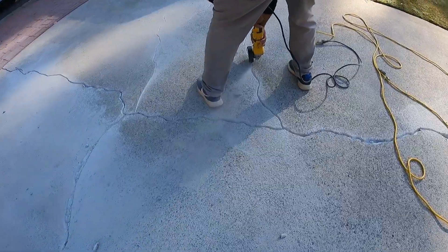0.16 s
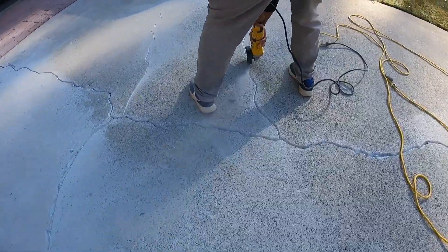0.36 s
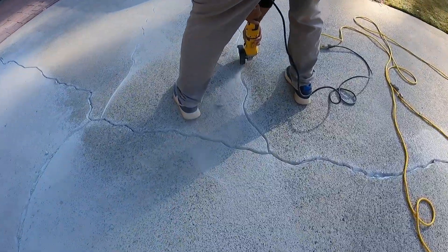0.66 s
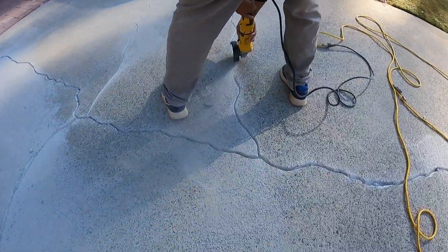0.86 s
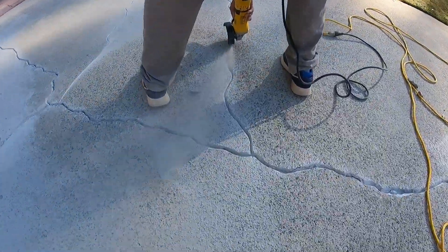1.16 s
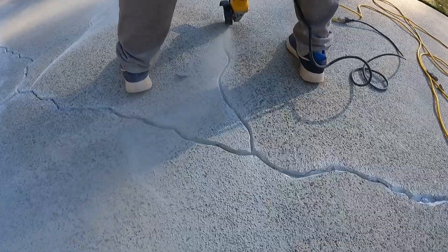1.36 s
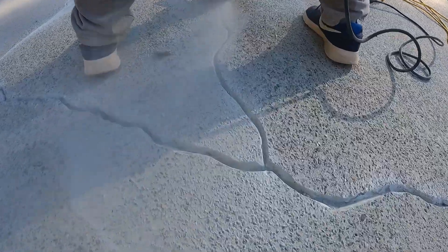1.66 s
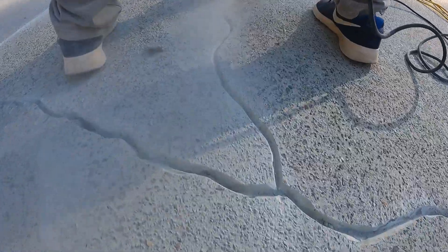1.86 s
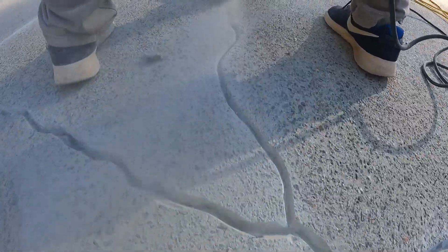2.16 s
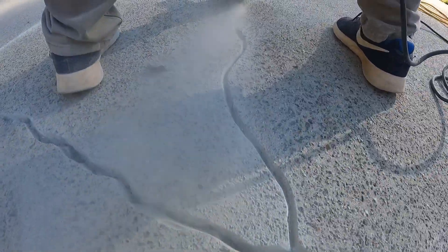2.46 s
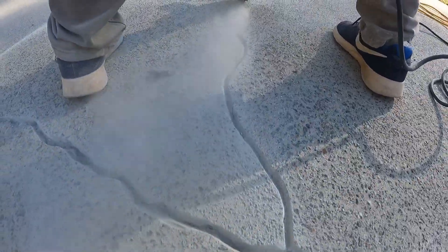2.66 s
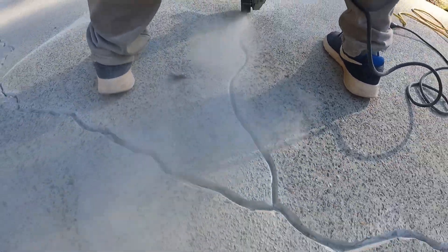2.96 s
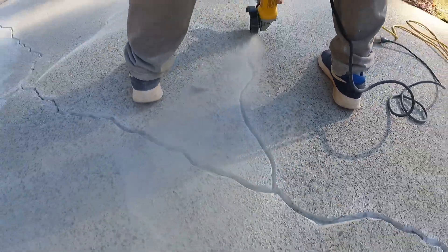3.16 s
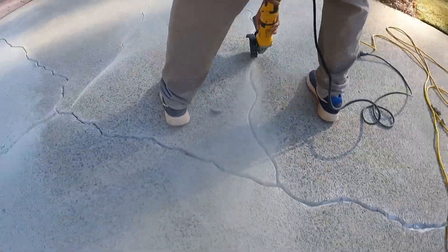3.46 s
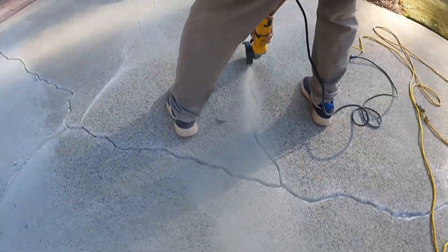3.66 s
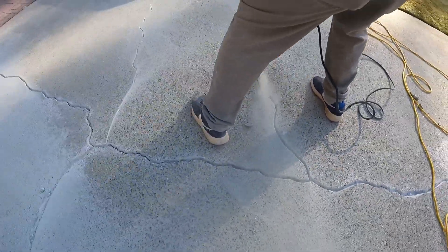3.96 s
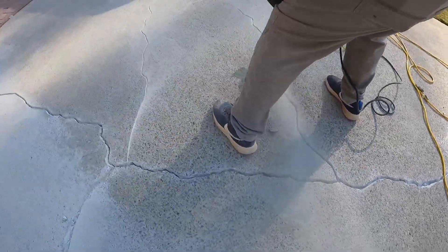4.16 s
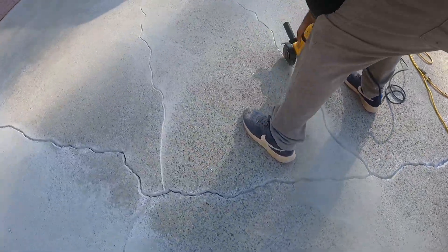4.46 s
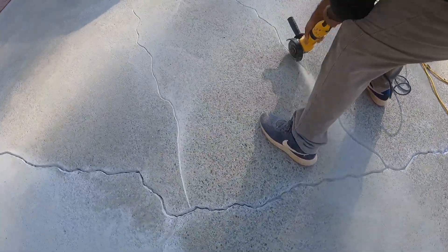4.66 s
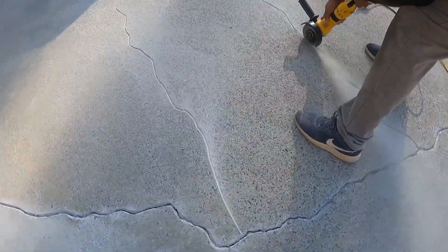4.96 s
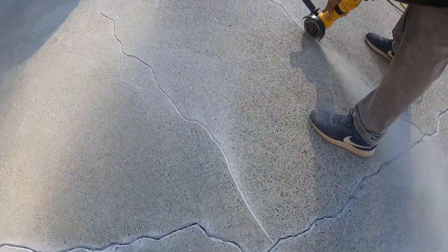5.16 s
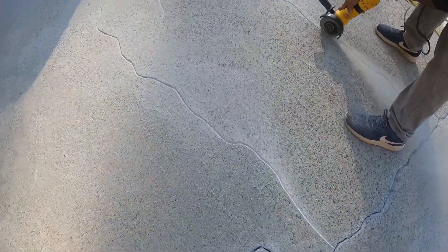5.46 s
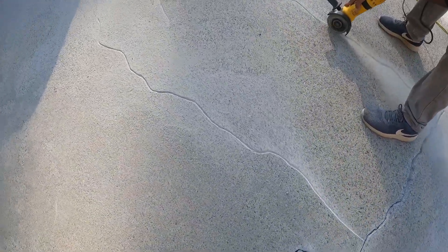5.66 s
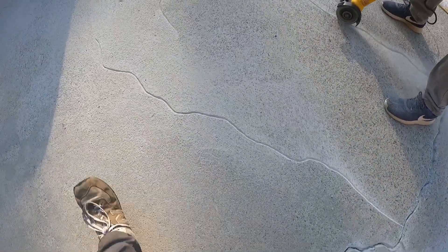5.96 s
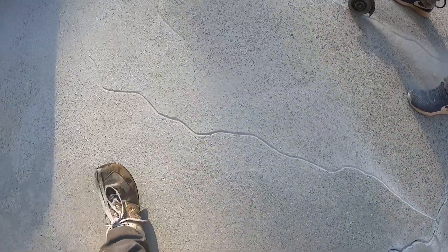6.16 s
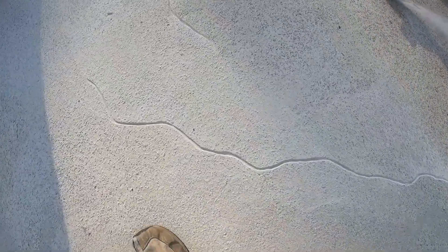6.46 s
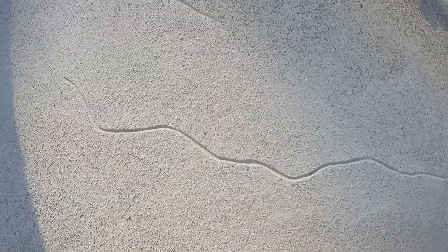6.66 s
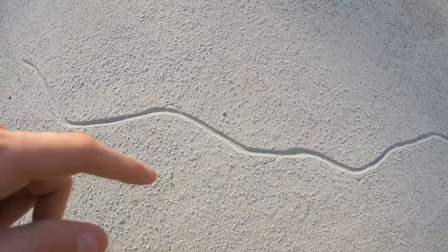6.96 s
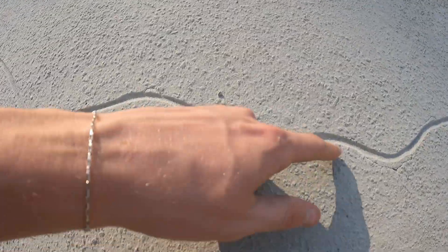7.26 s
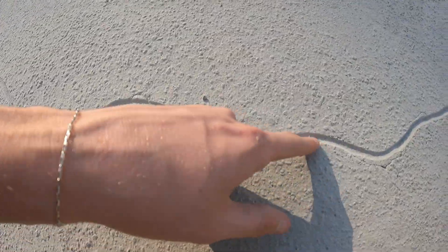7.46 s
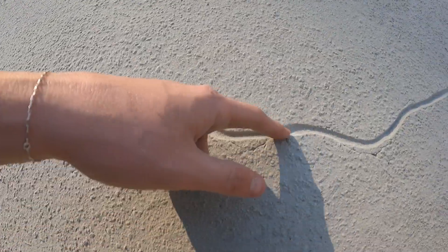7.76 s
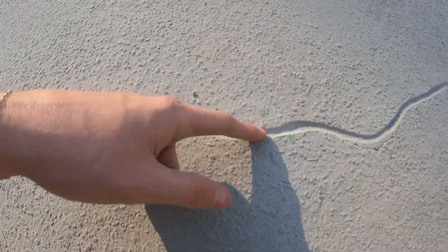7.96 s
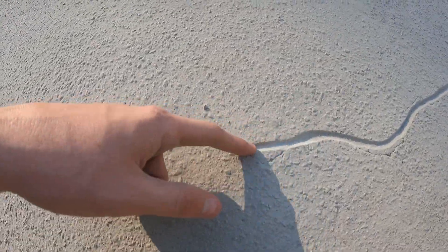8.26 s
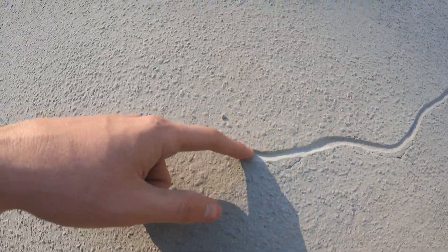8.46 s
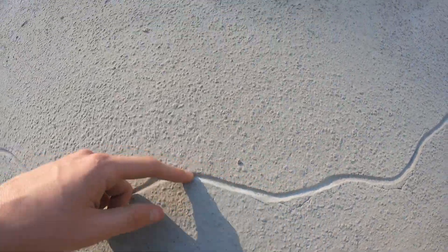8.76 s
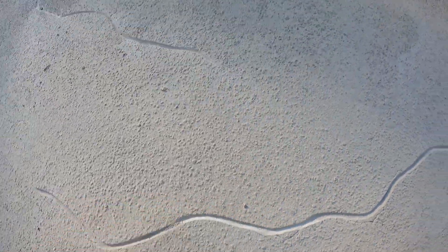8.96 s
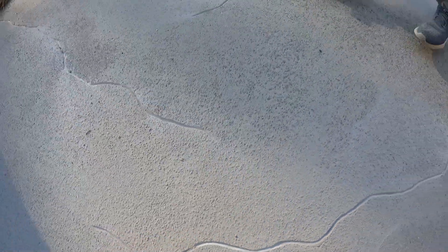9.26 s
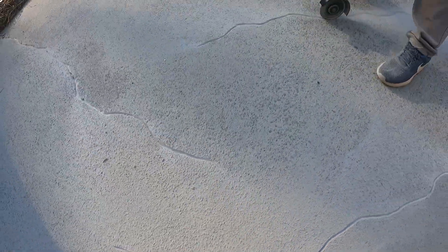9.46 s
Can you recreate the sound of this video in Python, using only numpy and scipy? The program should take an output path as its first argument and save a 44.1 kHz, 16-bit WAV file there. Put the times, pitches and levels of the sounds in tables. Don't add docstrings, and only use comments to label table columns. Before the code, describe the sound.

Outdoors, a corded angle grinder cuts concrete continuously, its gritty hiss and motor hum topped by flickering high metallic squeals from the disc.

```python
import sys
import numpy as np
from scipy import signal
from scipy.fft import irfft
from scipy.io import wavfile
from scipy.ndimage import uniform_filter1d

SR = 44100
rng = np.random.default_rng(int(sys.argv[2]) if len(sys.argv) > 2 else 0)


def to_linear_factor(level_db):
    exponent = np.asarray(level_db, float) / 20
    return 10 ** exponent


def master_out(mix):
    frames = np.transpose(np.atleast_2d(mix))
    ceiling = np.clip(frames, -1, 1)
    pcm = np.round(ceiling * 32767).astype(np.int16)
    wavfile.write(sys.argv[1], SR, pcm)


N = 423801
T = np.arange(N) / SR

# f/Hz, level/dB per Hz
YARD_RUMBLE = [(20, -21), (60, -5), (120, -9.5), (250, -8), (600, -15), (900, -24), (9000, -24),
               (13000, -30.5)]
YARD_RUMBLE_DB = -53
# f/Hz, level/dB per Hz
AIR_HISS = [(9000, -42), (11000, -15), (12800, -5), (14300, -17), (15400, -15)]
# t/s, level/dB
AIR_HISS_LEVEL = [
    (0, -79),
    (.45, -67),
    (.55, -54),
    (1.5, -48),
    (4.3, -51),
    (5, -51),
    (6, -61),
    (9.61, -78),
]
# t/s, length/s, level/dB
HAND_BUMPS = [
    (0.15, 0.34, -59),
    (2.1, 0.29, -50.5),
    (7.05, 0.091, -49),
    (7.65, 0.17, -52),
    (9.2, 0.33, -50),
]
# f/Hz, level/dB per Hz
BUMP_COLOUR = [(45, -25), (95, -4), (400, -29)]

# t/s, speed/turns per s
WHEEL_SPEED = [(0.0, 128.7), (0.6, 129.0), (1.0, 129.85), (1.45, 130.0), (1.8, 128.86), (2.3, 127.15),
               (2.85, 124.7), (3.25, 126.2), (3.85, 127.45), (4.1, 126.9), (4.85, 123.95), (5.7, 124.0),
               (6.25, 126.5), (6.9, 126.7), (7.45, 124.3), (8.4, 123.45), (8.8, 123.9), (9.61, 127.9)]
JUDDER = 0.22
# t/s, unbalance at 1 and 2 per turn level/dB, rim segments at 8 per turn level/dB,
# share of the scrape repeated each turn/0-1
WHEEL_ERRORS = [(0, -75, -74, 0), (2, -65, -73, 0.2), (4.2, -97, -50, 0.06), (4.6, -73, -51, 0.3),
                (5.7, -65, -46, 0.18), (6.5, -67, -57, 0.13), (7.1, -71, -46, 0.2), (7.5, -59, -85, 0.17),
                (9, -62, -78, 0.28), (9.61, -64, -45, 0.1)]
# multiple of armature turns, level/dB
ARMATURE_PARTIALS = [(1, -51), (2, -62), (3, -60.5), (6, -54.5)]
# t/s, level/dB
ARMATURE_HEARD = [
    (0, -2),
    (1.5, 2),
    (2.4, 9),
    (3.5, 1),
    (4.5, 2),
    (5.5, -7),
    (9, -6),
    (9.61, -4),
]
GEAR_RATIO = 42 / 9
# t/s, length/s, level/dB
RIM_RUBS = [(5.147, 0.73, -44), (6.242, 0.3, -42), (6.609, 0.44, -50.5), (7.097, 1.4, -51), (7.3, 1.2, -48),
            (7.7, .7, -50), (7.703, 0.42, -46), (8.98, 0.15, -42), (7.1, 0.8, -58), (2.37, 0.27, -35.5),
            (2.982, 0.366, -43)]
RIM_RUB_ORDERS = [24, 21, 19, 14, 19, 15, 16, 19, 2, 41, 41]

# f/Hz, width/Hz
LOUD_MODES = [(4910, 56), (5424, 25), (6428, 23), (7607, 32)]
# f/Hz, width/Hz
LOW_MODE = (4165, 70)
# f/Hz, width/Hz
SOFT_MODE = (5172, 70)
# f/Hz, level/dB
FAINT_MODES = [(8624, -46), (8796, -51), (9017, -61), (9781, -58.5), (10002, -50), (10767, -59),
               (11240, -61), (11719, -55), (12279, -61), (12748, -67), (13189, -65), (13991, -76),
               (14420, -70), (15181, -75)]
# t/s, length/s, level/dB
MODE_1_BINDS = [(0.215, 0.082, -42), (0.37, 0.08, -43), (0.595, 0.041, -41), (0.655, 0.11, -40),
                (0.74, 0.029, -31), (0.795, 0.1, -42), (0.945, 0.09, -36.9), (1.125, 0.076, -34),
                (1.275, 0.029, -30), (1.345, 0.12, -37), (1.465, 0.042, -26), (1.505, 0.03, -34.1),
                (1.545, 0.093, -31), (1.635, 0.052, -27), (1.685, 0.12, -29.5), (1.805, 0.08, -35),
                (2.385, 0.17, -38.5), (2.555, 0.11, -34.5), (2.675, 0.043, -37), (2.715, 0.085, -32.5),
                (2.895, 0.09, -38), (3.075, 0.037, -37.1), (3.115, 0.036, -29), (3.205, 0.097, -36),
                (3.325, 0.06, -36), (3.425, 0.03, -39), (3.505, 0.1, -35), (3.665, 0.05, -38),
                (3.755, 0.21, -36), (4.265, 0.04, -27), (4.345, 0.024, -18), (4.375, 0.079, -32.5),
                (4.465, 0.12, -38), (4.635, 0.16, -37), (4.795, 0.05, -36.1), (4.865, 0.099, -35),
                (4.955, 0.04, -40), (4.995, 0.18, -38.5), (5.205, 0.035, -31), (5.235, 0.45, -43),
                (5.825, 0.188, -37.5), (6.005, 0.17, -31), (6.205, 0.1, -37), (6.495, 0.048, -33),
                (6.585, 0.037, -35), (6.665, 0.073, -34), (6.735, 0.042, -28), (6.785, 0.08, -38),
                (6.875, 0.11, -32), (6.995, 0.05, -39), (7.1, 0.75, -43.5), (7.965, 0.055, -39),
                (9.025, 0.14, -36.5), (9.105, 0.069, -39.5), (9.155, 0.047, -27.5), (9.195, 0.03, -38.4),
                (9.225, 0.051, -22.5), (9.295, 0.026, -27), (9.335, 0.037, -24), (9.395, 0.03, -32)]
MODE_2_BINDS = [(0.075, 0.09, -43), (0.165, 0.13, -33.5), (0.305, 0.044, -38), (0.565, 0.03, -40),
                (0.805, 0.15, -48), (0.985, 0.12, -39.4), (1.485, 0.11, -38), (2.425, 0.14, -45),
                (2.615, 0.06, -40.7), (3.135, 0.045, -29), (3.195, 0.35, -48), (3.565, 0.14, -41),
                (3.755, 0.09, -43), (3.945, 0.08, -42), (4.355, 0.06, -39), (4.605, 0.03, -34),
                (4.665, 0.12, -38), (4.805, 0.046, -27), (4.865, 0.063, -31), (4.985, 0.063, -31.9),
                (5.045, 0.031, -33), (5.085, 0.034, -23), (5.225, 0.13, -33.5), (5.435, 0.19, -37),
                (5.955, 0.18, -35), (6.145, 0.1, -32), (6.275, 0.51, -41), (7.015, 0.16, -34),
                (7.185, 0.065, -34.5), (7.295, 0.03, -33), (7.385, 0.089, -30), (7.495, 0.049, -29),
                (7.575, 0.12, -39.5), (7.775, 0.069, -36), (7.865, 0.07, -43), (7.965, 0.04, -32),
                (8.035, 0.04, -30), (8.075, 0.052, -33), (8.125, 0.058, -29.7), (8.165, 0.083, -39),
                (8.235, 0.047, -28), (8.285, 0.054, -34), (8.395, 0.04, -25), (8.465, 0.043, -26),
                (8.515, 0.061, -32), (8.635, 0.23, -34.5), (8.805, 0.034, -40), (9.195, 0.061, -26),
                (9.255, 0.08, -30), (9.405, 0.058, -40)]
MODE_3_BINDS = [(0, 0.16, -40.5), (0.165, 0.054, -34), (0.25, 0.14, -41), (0.995, 0.084, -27),
                (1.545, 0.055, -33), (1.675, 0.037, -28), (1.775, 0.06, -27), (1.835, 0.11, -31.5),
                (1.975, 0.027, -30), (2.025, 0.36, -35), (2.435, 0.034, -28), (2.505, 0.06, -28),
                (2.605, 0.032, -33), (2.655, 0.45, -40), (3.135, 0.053, -30.5), (3.625, 0.075, -33),
                (3.955, 0.04, -30), (4.275, 0.054, -32), (4.395, 0.17, -37), (4.595, 0.04, -30),
                (4.665, 0.18, -33.5), (4.815, 0.026, -20.5), (4.845, 0.053, -27), (4.915, 0.027, -30),
                (4.985, 0.028, -22), (5.015, 0.058, -32.5), (5.085, 0.031, -24), (5.345, 0.029, -22),
                (5.385, 0.12, -28.5), (5.555, 0.086, -23.5), (5.655, 0.037, -25), (5.715, 0.031, -21),
                (5.795, 0.024, -23), (5.875, 0.029, -17), (5.955, 0.22, -31), (6.325, 0.038, -26),
                (6.385, 0.039, -28), (6.435, 0.047, -21.5), (6.495, 0.09, -30), (6.605, 0.033, -28),
                (6.805, 0.03, -32), (6.875, 0.056, -27), (7.015, 0.14, -26), (7.16, 0.1, -38),
                (7.5, 0.37, -46), (8.035, 0.083, -32), (8.135, 0.042, -26), (8.165, 0.05, -35),
                (8.235, 0.053, -27), (8.395, 0.059, -26.5), (8.465, 0.11, -28.5), (8.645, 0.055, -29),
                (8.705, 0.06, -34), (8.805, 0.03, -27), (8.945, 0.05, -37), (9.025, 0.11, -35),
                (9.184, 0.045, -25), (9.275, 0.039, -21), (9.315, 0.094, -30.5), (9.405, 0.045, -24.5),
                (9.475, 0.089, -23.5), (9.565, 0.047, -31)]
MODE_4_BINDS = [(0.315, 0.04, -42), (1.695, 0.13, -39), (1.865, 0.19, -44), (2.125, 0.04, -34),
                (2.305, 0.094, -36), (2.405, 0.034, -42), (2.435, 0.27, -45), (2.745, 0.1, -38),
                (2.895, 0.09, -36), (3.345, 0.031, -31), (3.425, 0.044, -40), (4.635, 0.032, -38),
                (4.955, 0.3, -47), (5.285, 0.034, -35), (5.345, 0.45, -44), (5.845, 0.32, -46),
                (6.365, 0.036, -34), (6.395, 0.22, -43), (6.645, 0.12, -36), (6.805, 0.03, -42),
                (6.835, 0.029, -29), (6.865, 0.05, -37), (6.985, 0.13, -42), (7.245, 0.085, -35),
                (7.455, 0.15, -41), (7.665, 0.23, -40), (8.105, 0.03, -30), (8.165, 0.18, -40),
                (8.365, 0.032, -30), (8.455, 0.034, -32), (8.485, 0.25, -43), (8.795, 0.033, -37),
                (8.925, 0.032, -37), (8.955, 0.034, -31), (8.985, 0.09, -40), (9.135, 0.043, -34),
                (9.215, 0.048, -35), (9.285, 0.07, -39), (9.355, 0.066, -35), (9.475, 0.1, -42)]
# t/s, length/s, level/dB
LOW_MODE_BINDS = [(0.005, 0.4, -47), (0.505, 0.21, -49.5), (0.745, 0.032, -41), (0.895, 0.47, -44),
                  (1.435, 0.066, -38), (1.525, 0.04, -39), (1.665, 0.13, -44.7), (2.465, 0.15, -36),
                  (2.675, 0.059, -42.5), (3.085, 0.24, -37), (3.475, 0.044, -30), (3.525, 0.25, -43),
                  (4.935, 0.15, -45), (5.205, 0.05, -38), (5.305, 0.16, -38), (5.535, 0.26, -46),
                  (5.945, 0.17, -45), (6.115, 0.064, -36), (6.185, 0.21, -42), (6.585, 0.25, -42.5),
                  (6.935, 0.068, -40), (7.105, 0.04, -36), (7.485, 0.22, -44), (7.755, 0.25, -50),
                  (7.985, 0.21, -41), (8.215, 0.12, -42), (8.365, 0.033, -34), (8.395, 0.42, -45),
                  (8.945, 0.033, -49), (9.045, 0.17, -43.2)]
SOFT_MODE_BINDS = [
    (3.5, .4, -41),
    (4.7, .6, -44),
    (6.67, 0.16, -43),
    (9.08, .2, -43),
]
MODE_IDLE_DB = [-45.5, -46, -43, -50, -51, -66]
MODE_FLUTTER_DB = [2.3, 1.3, 1.3, 1.8, 1.6, 1.6]
SWELL_S = 0.028
# t/s, length/s, level/dB
FAMILY_1_BINDS = [(2.74, 0.2, -46.5), (3.278, 0.12, -50), (4.903, 0.22, -46), (6.35, 0.046, -42.0),
                  (6.54, 0.082, -49), (6.638, 0.064, -40), (6.7, 0.21, -47.5), (7.21, 0.62, -53),
                  (7.834, 0.53, -45.5), (8.39, 0.65, -47.5), (8.934, 0.13, -53), (9.072, 0.08, -48),
                  (9.275, 0.17, -45)]
FAMILY_2_BINDS = [(5.17, 0.14, -49), (5.67, 1.1, -49), (6.68, 0.12, -51), (6.81, 0.082, -55),
                  (7.14, 0.37, -48), (7.45, 0.67, -48.5), (8.12, 0.13, -43), (8.24, 0.06, -47),
                  (8.3, 0.42, -43), (8.72, 0.43, -45), (9.14, 0.15, -46)]
FAMILY_3_BINDS = [(3.58, 0.55, -58), (4.96, 0.35, -53), (5.34, 0.63, -57), (6.17, 0.86, -56),
                  (7.16, 1.14, -54), (8.3, 0.1, -51), (8.4, 0.82, -53.5), (9.34, 0.22, -51.5)]
FAMILY_IDLE_DB = [-53.5, -53.5, -62]
FAMILY_BORDERS = [9400, 11000]

# f/Hz, level/dB per Hz
GRIT_SPECTRUM = [(24, -45), (40, -32), (589, -2), (684, -1.5), (993, 2), (1440, 0.5), (2970, -2.5),
                 (4540, -3), (5400, 2.5), (5970, -3), (6430, 1.5), (8040, -11), (12300, -23), (13600, -26),
                 (15400, -74)]
# t/s, level/dB, hump lifted by the slab echo f/Hz, hump level/dB
CUT_COURSE = [(0.0, -32.5, 3380, 12), (0.67, -30, 3490, 14), (1.4, -26, 3480, 7), (1.74, -28.5, 2780, 6),
              (2.35, -30, 2650, 8), (2.99, -31, 2440, 8.5), (3.21, -30, 3330, 4), (3.74, -28, 3780, 9.5),
              (4.04, -30.5, 4030, 4), (4.63, -29, 3200, 5), (5.57, -33.5, 2880, 8.5),
              (6.15, -32.5, 2950, 4.5), (6.4, -32.5, 2640, 4.5), (6.7, -32.5, 3650, 3),
              (7.31, -36, 2810, 9), (8.08, -32.5, 3100, 7), (9.04, -31, 2920, 4), (9.23, -33, 3320, 3)]
# f/Hz, width/Hz, level/dB
GUARD_MODES = [(2450, 88, 3), (2955, 190, 2.5), (3840, 490, 0), (974, 66, 2), (8240, 170, -7.5),
               (9440, 200, -6), (4530, 145, -1.5), (10200, 60, 7)]
# middle t/s, length/s, f/Hz, level/dB
COMB_SHADES = [(.7, 1, 3440, -3.5), (1.4, 0.43, 1800, 3.5), (2.3, 1.4, 2700, 3), (5.547, 0.68, 1490, -8.5),
               (6.192, 0.97, 1860, -7), (6.258, 0.28, 3440, 3.5), (6.37, 0.23, 2560, 4),
               (7.098, 0.74, 1820, 5.5), (7.75, 0.46, 3650, -3), (8.4, 1.9, 4160, 3.5),
               (4.2, 0.2, 3040, 4.5), (6.95, 0.49, 3150, 2.5), (9.6, 0.38, 1000, 5.5), (9.6, .3, 2900, 7),
               (9.6, 0.42, 4000, 3)]
SHADE_WIDTH = 0.095

# t/s, bass gained low over the slab level/dB, facing the disc/0-1
CAMERA_POSE = [(0, -12, 0.16), (0.6, -11, 0.3), (1.31, -15.5, 0.1), (1.6, -8.5, 0.44), (2.3, -5, 0.58),
               (2.8, -5, 0.51), (3.3, -10, 0.71), (3.7, -13, 0.2), (4.04, -10.5, 0.29), (4.63, -13, 0.42),
               (4.92, -20, 0.27), (5.3, -10.5, 0.64), (6.15, -14.5, 0.68), (6.9, -13, 0.63), (7.3, -7, 1),
               (8.6, -12, 0.83), (9.1, -12.5, 0.68), (9.61, -16, 0.53)]
TREBLE_SWING_DB, VALLEY_SWING_DB = 17, 13.5
VALLEY_FILL = 0.064
# until t/s, above f/Hz, level/dB
BODY_SHADOW = (.52, 11600, -13)
# t/s, bent round the camera level/dB, left-right level/dB
OFF_AXIS_COURSE = [(0, -66, 0), (2.3, -28, 0.5), (3.5, -25, 1), (4.1, -24, 1), (4.4, -10.5, -1.5),
                   (5.5, -11, -3), (6.7, -7.5, -2), (7.5, -8.5, -2), (8.2, -10.5, -1), (8.7, -7.5, -2),
                   (9.61, -10, -2)]
# f/Hz, level/dB
BENT_SPECTRUM = [(300, -10.5), (1500, -15), (2600, -1), (4000, -2.5), (6000, -11.5), (10000, -13.5),
                 (13000, 4)]
PORT_LAG = 2


def evened(x):
    return x / np.sqrt(np.mean(x ** 2) + 1e-20)


def read(points, hz):
    f, value = np.transpose(points)
    return np.interp(np.log(hz + 1), np.log(f + 1), value)


def curves(rows, t):
    s, *columns = np.transpose(rows)
    return [np.interp(t, s, c) for c in columns]


def log_bell(hz, centre_hz, width):
    return np.exp(-(np.log(hz / centre_hz + 1e-9) / width) ** 2)


def drift(top_hz, low_hz=0.3):
    t = T[::200]
    slow = sum(np.sin(2 * np.pi * (f * t + rng.random())) / np.sqrt(f)
               for f in np.geomspace(low_hz, top_hz, 16))
    return np.interp(T, t, evened(slow))


def steadied(x, size):
    return x / np.sqrt(abs(uniform_filter1d(x ** 2, size)) + 1e-20)


def coloured(x, shape_db):
    hz, t, z = signal.stft(x, SR, nperseg=1024, noverlap=768)
    shaped = z * to_linear_factor(shape_db(hz[:, None], t))
    return signal.istft(shaped, SR, nperseg=1024, noverlap=768)[1][:N]


def patches(hz, t):
    field = rng.standard_normal((len(t), len(hz))).T
    across_hz = uniform_filter1d(field, size=10, axis=0)
    return evened(uniform_filter1d(across_hz, size=14, axis=1))


def singing_db(binds, idle_db):
    t = T[::200]
    start, length, db = np.transpose(binds)[:, :, None]
    rise = np.tanh(2 * (t - start) / SWELL_S)
    fall = np.tanh(2 * (t - start - length) / SWELL_S)
    on = (rise - fall) / 2
    return np.interp(T, t, idle_db + (on * (db - idle_db)).sum(axis=0))


def hiss(spectrum, patchy_db):
    return evened(coloured(rng.standard_normal(N),
                           lambda hz, t: read(spectrum, hz) + patchy_db * patches(hz, t)))


def yard_rumble():
    return to_linear_factor(YARD_RUMBLE_DB + 0.8 * drift(top_hz=3.6)) * hiss(YARD_RUMBLE, patchy_db=0.5)


def air_hiss():
    return to_linear_factor(curves(AIR_HISS_LEVEL, T)[0] - 4.5) * hiss(AIR_HISS, patchy_db=1)


def hand_bumps():
    return to_linear_factor(singing_db(HAND_BUMPS, -70)) * hiss(BUMP_COLOUR, patchy_db=1)


def unlike_noise():
    air = to_linear_factor(curves(AIR_HISS_LEVEL, T)[0]) * hiss(AIR_HISS, patchy_db=3)
    return air + to_linear_factor(YARD_RUMBLE_DB - 14.5) * hiss(YARD_RUMBLE, patchy_db=6)


def tone(cycles, db):
    shake = 0.2 * drift(top_hz=40)
    level = np.sqrt(2) * to_linear_factor(db + 2 * drift(top_hz=18))
    return level * np.sin(2 * np.pi * (cycles + shake + rng.random()))


def armature(turns):
    hum = sum(tone(k * GEAR_RATIO * turns, db) for k, db in ARMATURE_PARTIALS)
    return to_linear_factor(curves(ARMATURE_HEARD, T)[0]) * hum


def wheel_errors(turns):
    unbalance_db, segments_db, _ = curves(WHEEL_ERRORS, T)
    unbalance = tone(turns, unbalance_db) + tone(2 * turns, unbalance_db - 5)
    return unbalance + tone(8 * turns, segments_db - 2 + 2.5 * drift(top_hz=12))


def rim_rubs(turns):
    sway = drift(top_hz=25.3)
    rubs = sum(to_linear_factor(singing_db([row], -75) + 2 * sway) * np.sin(2 * np.pi * k * turns + k + sway / 4)
               for row, k in zip(RIM_RUBS, RIM_RUB_ORDERS))
    return np.sqrt(2) * rubs


def scrape(turns, share, turns_kept):
    patterns = evened(irfft(np.exp(2j * np.pi * rng.random((200, 193))), axis=1))
    age = turns / turns_kept
    row, mix = age.astype(int), np.pi / 2 * (age % 1)
    cell = (turns % 1 * 384).astype(int)
    repeat = np.cos(mix) * patterns[row, cell] + np.sin(mix) * patterns[row + 1, cell]
    return np.sqrt(share) * repeat + np.sqrt(1 - share) * rng.standard_normal(N)


def ring(x, hz, width):
    pole = np.exp((-np.pi * width + 2j * np.pi * hz) / SR)
    return signal.lfilter([1], [1, -2 * pole, pole ** 2], x).real


def loud_modes(force):
    modes = LOUD_MODES + [LOW_MODE, SOFT_MODE]
    binds = [MODE_1_BINDS, MODE_2_BINDS, MODE_3_BINDS, MODE_4_BINDS, LOW_MODE_BINDS, SOFT_MODE_BINDS]
    song = 0
    for (hz, width), rows, idle_db, flutter_db in zip(modes, binds, MODE_IDLE_DB, MODE_FLUTTER_DB):
        level_db = singing_db(rows, idle_db) + flutter_db * drift(top_hz=45.3, low_hz=10)
        song = song + to_linear_factor(level_db) * steadied(ring(force, hz, width), size=640)
    return song


def faint_modes(force):
    facing_db = curves(CUT_COURSE, T)[0] + TREBLE_SWING_DB * curves(CAMERA_POSE, T)[1]
    turned = np.tanh((T - 4.9) / 0.13) / 2
    families = zip([FAMILY_1_BINDS, FAMILY_2_BINDS, FAMILY_3_BINDS], FAMILY_IDLE_DB)
    family_db = [singing_db(rows, db) - db - 7 for rows, db in families]
    song = 0
    for hz, db in FAINT_MODES:
        bind_db = family_db[np.searchsorted(FAMILY_BORDERS, hz)]
        level_db = db + 2.2 * drift(top_hz=34.8, low_hz=4) + turned * hz / 4000 + bind_db
        song = song + to_linear_factor(level_db) * evened(ring(force, hz, 0.0089 * hz))
    return song * to_linear_factor(0.26 * (facing_db - facing_db.mean()) + 1.5)


def blade(turns):
    force = scrape(turns, share=0.72, turns_kept=38)
    beat = 1 + 0.025 * np.cos(2 * np.pi * turns)
    return beat * (loud_modes(force) + faint_modes(force))


def grit_colour(hz, t):
    level_db, hump_hz, hump_db = curves(CUT_COURSE, t)
    bass_db, facing = curves(CAMERA_POSE, t)
    treble_db = TREBLE_SWING_DB * facing
    valley_db = VALLEY_SWING_DB * facing + VALLEY_FILL * bass_db
    hump = hump_db * log_bell(hz, hump_hz, 0.34)
    second = 0.56 * hump_db * log_bell(hz, 2.95 * hump_hz, 0.25)
    valley = (valley_db - valley_db.mean()) * log_bell(hz, 1600, 0.56)
    bass = (bass_db - bass_db.mean()) / (1 + (hz / 1100) ** 4)
    treble = (treble_db - treble_db.mean()) / (1 + (7000 / (hz + 1)) ** 4)
    guard = sum(db * np.exp(-((hz - f) / width) ** 2) for f, width, db in GUARD_MODES)
    shades = sum(db * np.exp(-(2 * (t - s) / length) ** 4) * log_bell(hz, f, SHADE_WIDTH)
                 for s, length, f, db in COMB_SHADES)
    echo = hump + second + valley + shades
    return (read(GRIT_SPECTRUM, hz) - 33.6 + level_db + echo + guard + bass + treble
            + 0.76 * patches(hz, t))


def grit(turns):
    chip_size = to_linear_factor(2.3 * np.minimum(rng.exponential(1, N), 3))
    chips = chip_size * (rng.random(N) < 600 / SR) * rng.choice([-1, 1], N)
    bump = 1 + 0.058 * np.cos(2 * np.pi * turns)
    share = np.clip(curves(WHEEL_ERRORS, T)[2], 0, 1)
    force = scrape(turns, share, turns_kept=45) * bump + 1.77 * chips
    return 60 * coloured(force * to_linear_factor(0.6 * drift(top_hz=12)), grit_colour)


def body_shadow_db(hz, t):
    until_s, above_hz, hidden_db = BODY_SHADOW
    hidden = (1 - np.tanh((t - until_s) / 0.05)) / 2
    return hidden_db * hidden / (1 + (above_hz / (hz + 1)) ** 24)


def bent_sound(tool):
    delayed = np.roll(tool, 310) - np.roll(tool, 733)
    return coloured(delayed, lambda hz, t: read(BENT_SPECTRUM, hz) + curves(OFF_AXIS_COURSE, t)[0])


def scene():
    turns = np.cumsum(curves(WHEEL_SPEED, T)[0] + JUDDER * drift(top_hz=9)) / SR
    motor = armature(turns) + wheel_errors(turns) + rim_rubs(turns)
    tool = coloured(motor + blade(turns) + grit(turns), body_shadow_db)
    mid = tool + yard_rumble() + air_hiss() + hand_bumps()
    lean = np.tanh(curves(OFF_AXIS_COURSE, T)[1] * np.log(10) / 40)
    leaning = lean * (mid + PORT_LAG * np.gradient(mid))
    side = unlike_noise() + leaning + bent_sound(tool)
    return np.array([mid + side, mid - side])


def low_pass(x):
    return signal.sosfilt(signal.butter(12, 15520, fs=SR, output="sos"), x)


def record(dry):
    power = abs(uniform_filter1d((dry ** 2).mean(0), size=1300))
    power_db = 10 * np.log10(power + 1e-12)
    held = dry / to_linear_factor(0.56 * uniform_filter1d(power_db + 24, size=600))
    edge = signal.firwin(255, 15600, window=("kaiser", 9), fs=SR)
    return low_pass(signal.oaconvolve(held, edge[None], "same"))


dry = scene()
out = record(dry)
master_out(out)
```